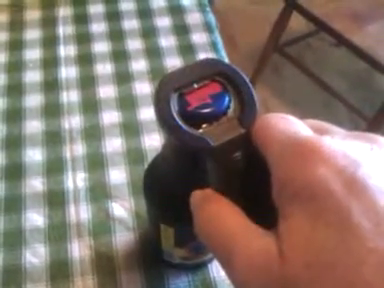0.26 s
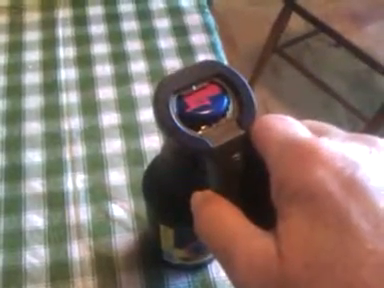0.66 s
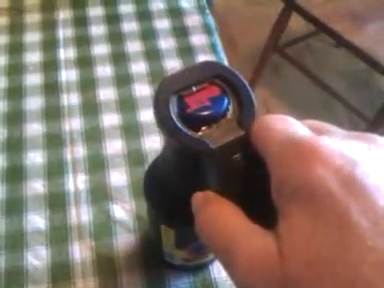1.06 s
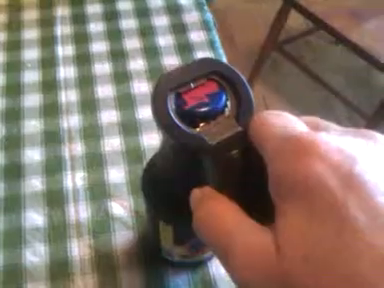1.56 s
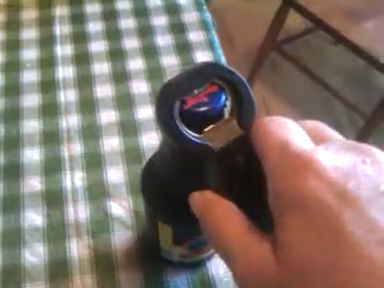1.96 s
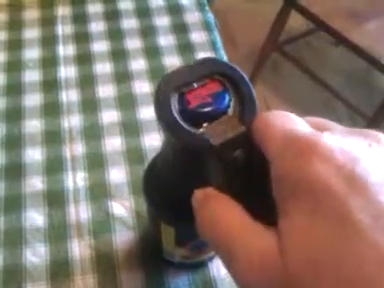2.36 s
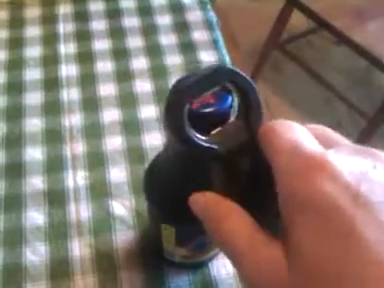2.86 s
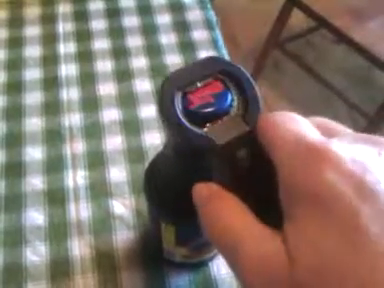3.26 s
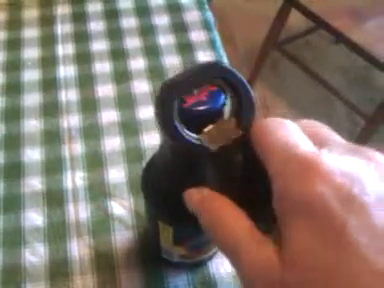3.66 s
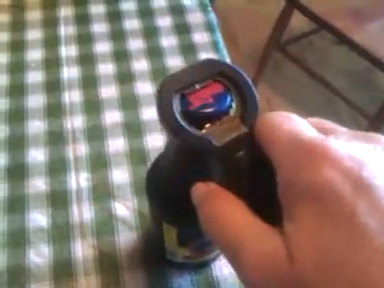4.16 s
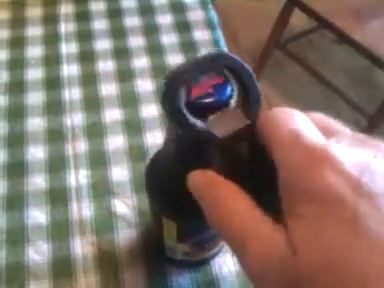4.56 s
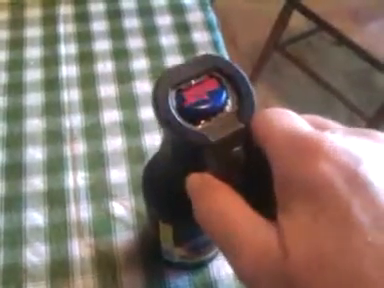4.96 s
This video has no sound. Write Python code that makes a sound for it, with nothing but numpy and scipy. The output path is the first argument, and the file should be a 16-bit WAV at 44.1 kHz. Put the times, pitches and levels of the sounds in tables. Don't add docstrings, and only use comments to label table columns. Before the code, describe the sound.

In a quiet indoor room, a small microphone with muffled treble picks up hum and soft hiss. First come four hollow, honking rubs of a hand on a plastic case. Then steel meets bottle cap: faint and firm ticks, brief gritty drags, short cap rings and low wooden knocks, the hardest clack near the end, then only room air.

```python
import sys
import numpy as np
from scipy import signal
from scipy.fft import rfft, irfft
from scipy.io import wavfile
from scipy.ndimage import uniform_filter1d, minimum_filter1d

SR = 44100
rng = np.random.default_rng(int(sys.argv[2]) if len(sys.argv) > 2 else 0)


def persist_wave(psi):
    counts = np.round(np.clip(psi, -1, 1) * 32767).astype(np.int16)
    wavfile.write(sys.argv[1], SR, np.atleast_2d(counts).T)


def convert_level_to_amplitude(level_db):
    exponent = np.asarray(level_db, float) / 20
    return 10 ** exponent


N = 230510
LEAD = 300


def evened(x):
    return x / np.sqrt(np.mean(x ** 2) + 1e-20)


def read(points, hz):
    f, value = np.transpose(points)
    return np.interp(np.log(hz + 1), np.log(f + 1), value)


def add(mix, s, sound):
    part = mix[round(s * SR):][:len(sound)]
    part += sound[:len(part)]


def smoothed(x, size_0, size_1):
    return uniform_filter1d(uniform_filter1d(x, size_0, axis=0), size_1, axis=1)


def resonate(x, hz, width):
    turn = np.exp(2j * np.pi * hz * np.arange(len(x)) / SR)
    r = np.exp(-np.pi * width / SR)
    return 2 * (turn * signal.lfilter([1 - r], [1, -r], x / turn)).real


def body(x, modes):
    total = 0
    for hz, width, db in modes:
        once = resonate(x, hz, 1.76 * width)
        total = total + convert_level_to_amplitude(db) * resonate(once, hz, 1.76 * width)
    return evened(total)


def coloured(x, points):
    gain = convert_level_to_amplitude(read(points, np.fft.rfftfreq(len(x), 1 / SR)))
    return evened(irfft(rfft(x) * gain, len(x)))


def slips(size, per_s, spread_db):
    draw = rng.random((size, 3))
    happens = draw[:, 0] < per_s / SR
    strength = convert_level_to_amplitude(-spread_db * np.log(draw[:, 2] + 0.018))
    return happens * np.sign(draw[:, 1] - .5) * strength


def dying(hz, t60):
    t = np.arange(9000) / SR
    return convert_level_to_amplitude(-60 * t / t60) * np.sin(2 * np.pi * hz * t)


def air():
    # frequency in Hz, level in dB per Hz.
    air_colour = [(15, -52.5), (25, -6.5), (90, -10.5), (144, -9), (178, -6.5), (205, -4), (315, -4),
                  (380, -2), (596, -4), (720, -6), (3200, -14.5), (4670, -20), (7150, -21), (9300, -71),
                  (15700, -120)]
    # frequency in Hz, width in Hz, level in dB.
    port = (4705, 420, -70.5)
    # frequency of a hum note in Hz, level in dB rms.
    hum_notes = [(59.3, -77.5), (84.5, -73.5), (120, -79), (180, -78), (318, -73.5), (415, -75.5)]
    frames = N // 256 + 5
    patches = evened(smoothed(rng.standard_normal((513, frames)), 12, 16))
    hiss = coloured(rng.standard_normal(frames * 256), air_colour)
    z = signal.stft(hiss, nperseg=1024, noverlap=768)[2][:, :frames] * convert_level_to_amplitude(0.95 * patches)
    wash = convert_level_to_amplitude(-61.5) * evened(signal.istft(z, nperseg=1024, noverlap=768)[1][:N])
    wash = wash + convert_level_to_amplitude(port[2]) * body(rng.standard_normal(N), [port])
    t = np.arange(N) / SR
    for hz, db in hum_notes:
        waver = evened(resonate(rng.standard_normal(N), hz, 5))
        tone = np.sin(2 * np.pi * (hz * t + rng.random()))
        wash = wash + convert_level_to_amplitude(db) * evened(tone + 0.18 * waver)
    return wash


def room(x):
    # frequency in Hz, time to fade by 60 dB in seconds.
    fade_times = [(300, 0.11), (1500, 0.46), (7000, 0.15)]
    taps = np.zeros(SR // 2)
    at = np.arange(200, SR // 2 - 20, 20)
    taps[at + rng.integers(0, 20, len(at))] = rng.choice([-1., 1.], len(at))
    hz, t, z = signal.stft(taps, SR, nperseg=256)
    fading = convert_level_to_amplitude(-60 * t / read(fade_times, hz)[:, None])
    tail = signal.istft(z * fading, SR, nperseg=256)[1]
    return signal.fftconvolve(x, tail / np.linalg.norm(tail))[:N]


def thump(db, hz):
    rise = 1 - np.exp(-np.arange(9000) / SR / 0.0078)
    notes = dying(hz, 0.11) + 0.54 * dying(0.54 * hz, 0.081) + 0.29 * dying(1.2 * hz, 0.23)
    return convert_level_to_amplitude(db + 2.5) * rise * notes


def scrape(length, edge_db, table_db, rim_db):
    # frequency in Hz, width in Hz, level in dB.
    crimp = [(1300, 500, -0.5), (1630, 21, 7.5), (1900, 500, -17)]
    u = np.linspace(0, 1, round(length * SR))
    drive = slips(len(u), per_s=3300, spread_db=3.0)
    edge = convert_level_to_amplitude(edge_db) * body(drive, crimp)
    rumble = convert_level_to_amplitude(table_db) * body(drive, [(310, 130, -1.5), (546, 88, -0.5)])
    rim = convert_level_to_amplitude(rim_db) * body(drive, [(3380, 66, -2.0), (3080, 530, -7.0)])
    bite = np.minimum(u / 0.27, 1)
    ease = convert_level_to_amplitude(-4.5 * u ** 2)
    return (edge + rumble + rim) * bite * ease * signal.windows.tukey(len(u), .15)


def tick(blow_db, hz, knock_db, snap_db, edge_db, chatter):
    # frequency in Hz, level in dB, 60 dB fade in seconds.
    lasting = [(1174, -14.5, 0.037), (1407, -23.5, .08), (1630, -10, 0.53), (2630, -42, 0.17),
               (3420, -25, 0.07)]
    t = np.arange(len(chatter)) / SR
    colour = [(200, -25), (640, knock_db + 1), (hz, 0), (2300, -5), (3300, snap_db + 0.5),
              (5100, snap_db - 9.5), (7000, edge_db + 4.5), (9000, edge_db - 20)]
    grit = coloured(chatter, colour)
    steel = dying(hz, 0.021) + 0.56 * dying(0.836 * hz, 0.01)
    glass = convert_level_to_amplitude(knock_db + 1.0) * dying(637, 0.018)
    cap = convert_level_to_amplitude(snap_db + 2.5) * (dying(3265, 0.0073) + 0.77 * dying(3520, 0.0039))
    edge = convert_level_to_amplitude(edge_db + 6.0) * dying(6660, 0.0036)
    rattle = convert_level_to_amplitude(-60 * t / 0.0096) + convert_level_to_amplitude(-18.5 - 60 * t / 0.11)
    crack = convert_level_to_amplitude(-4) * grit * rattle + convert_level_to_amplitude(-3.5) * (steel + glass + cap + edge)
    crack = crack * (1 - np.exp(-t / 0.00081))
    rings = sum(convert_level_to_amplitude(db) * resonate(crack, f, 2.2 / t60) for f, db, t60 in lasting)
    lead_in = convert_level_to_amplitude(-27.5) * grit[-LEAD:] * np.linspace(.3, 1, LEAD)
    return convert_level_to_amplitude(blow_db) * np.concatenate([lead_in, crack + convert_level_to_amplitude(18) * rings])


def opener_ticks():
    # start in seconds, blow in dB, contact note in Hz,
    # glass knock and cap snap in dB relative to the blow.
    sharp = [
        (2.256, -41.5, 1640, 7, 8),
        (2.832, -51.5, 964, -20, -15),
        (3.152, -35, 1600, -3.5, 3.5),
        (4.566, -51, 1640, -13, -8),
        (4.779, -27, 1313, -10, -9),
        (4.784, -40, 1170, -20, -12),
    ]
    blunt = [(1.862, -52, 1160, 4, -19), (2.737, -44.5, 1540, 1.5, -25), (2.997, -50, 1290, -25, -19),
             (3.275, -28.5, 1277, -26, -9.5), (3.282, -39.5, 1200, -12, -5), (3.779, -37.5, 1590, -6, -8),
             (3.959, -52, 1580, 0, -12), (4.039, -29, 1545, -3.5, -7), (4.042, -41.5, 1670, 1.5, -30),
             (4.049, -37.5, 1900, -20, -23), (4.453, -41, 1470, 4.5, -7.5), (4.792, -34.5, 1300, -1, 1.5),
             (4.797, -37, 1410, -6, -20)]
    # start in seconds, level in dB, note in Hz.
    knocks = [
        (2.257, -50, 309),
        (3.153, -46, 282),
        (3.272, -46.5, 281.5),
        (4.039, -48, 298),
        (4.454, -50, 268),
        (4.778, -46, 281.4),
        (4.792, -46.5, 235),
    ]
    mix = np.zeros(N)
    for table, edge_db in ((sharp, 0.5), (blunt, -21)):
        for (s, *row), chatter in zip(table, rng.standard_normal((len(table), 9000))):
            add(mix, s - LEAD / SR, tick(*row, edge_db, chatter))
    for s, db, hz in knocks:
        add(mix, s, thump(db, hz))
    return mix


def opener_scrapes():
    # start in seconds, length in seconds, scrape in dB, table rumble in dB, rim in dB.
    drags = [(2.191, 0.057, -57.5, -60.5, -66), (2.26, 0.11, -65, -68, -70.5),
             (2.731, 0.12, -61.5, -62, -69), (3.782, .045, -65, -66, -63), (3.944, .07, -65.5, -61.5, -78),
             (4.457, 0.046, -70, -55.5, -76), (4.505, 0.091, -59.5, -56, -68),
             (3.285, 0.053, -63, -60, -77), (4.733, .045, -60, -64, -75), (4.06, 0.055, -62, -62.5, -72),
             (4.803, 0.056, -66, -66, -73)]
    mix = np.zeros(N)
    for s, *row in drags:
        add(mix, s, scrape(*row))
    return mix


def pressure_db(t):
    # touch in seconds, lift in seconds, pressure in dB, sag in dB, rise in seconds.
    strokes = [
        (-.05, 0.325, -39, -1.5, .03),
        (0.349, 0.417, -51.5, -3, 0.018),
        (0.467, 0.494, -48.5, 0.5, 0.011),
        (0.478, 0.659, -38.5, -1.5, 0.036),
        (0.661, 0.739, -46, -1.5, 0.012),
        (0.777, 0.96, -41.5, 0.5, 0.028),
        (0.981, 1.015, -56, -5, 0.011),
        (1.027, 1.256, -41, 0, 0.027),
        (1.262, 1.329, -51.5, -2, .01),
    ]
    touch, lift, db, sag_db, rise = np.transpose(strokes)[:, :, None]
    landing = -16 * np.clip(1 - (t - touch) / rise, 0, 9)
    sagging = sag_db * np.clip((t - touch) / (lift - touch), 0, 1) ** 1.8
    lifting = -549 * np.maximum(t - lift, 0)
    return 20 * np.log10(convert_level_to_amplitude(db + landing + sagging + lifting).sum(0))


def singing(drive, note, catches):
    t = np.arange(len(drive)) / SR
    ring = body(drive, [(*note, 0)])
    power = uniform_filter1d(uniform_filter1d(ring ** 2, size=500), size=500)
    swell = np.sqrt(abs(power) + 1e-3)
    ring = evened(ring / swell ** .8)
    swells = sum(convert_level_to_amplitude(db - 7.9 * (2 * (t - s) / length) ** 2) for s, length, db in catches)
    return ring, ring * swells


def rub():
    # frequency in Hz, width in Hz.
    hollow_note = (748, 39)
    wall_note = (872, 36)
    # middle in seconds, length in seconds, ring in dB.
    hollow_catches = [(0.104, 0.041, -30), (0.202, 0.048, -38.5), (0.296, 0.016, -45), (0.404, 0.025, -45),
                      (0.538, 0.078, -43), (0.632, 0.056, -31.5), (0.834, 0.05, -36.5), (.912, 0.043, -37),
                      (1.074, 0.056, -35.5), (1.185, 0.044, -33), (1.238, 0.046, -37)]
    wall_catches = [
        (0.054, 0.054, -41.5),
        (0.598, .04, -40.5),
        (0.698, 0.056, -40),
        (0.932, 0.046, -45.5),
        (1.11, 0.056, -49),
    ]
    # frequency in Hz, width in Hz, level in dB.
    wall_modes = [(867.6, 24, -0.5), (695, 72, -6), (805.5, 49, -1.5), (965, 16, -14), (857, 330, -15)]
    shell_modes = [(2800, 182, 3), (2958, 67, -2.5), (2640, 48, -6), (2418, 297, -5), (3096, 52, -6),
                   (1877, 167, -9), (2153, 74, -12.5), (1479, 50, -12.5), (4016, 26, -13.5)]
    # frequency in Hz, level in dB per Hz.
    fizz_colour = [(150, -60.5), (300, -15), (400, -8), (550, -8), (1000, 0.5), (1300, -2), (2000, -2.5),
                   (3300, -1.5), (3700, -6.5), (4800, -12), (5300, -41), (7500, -54)]
    t = np.arange(0, 1.6, 1 / SR)
    press_db = pressure_db(t)
    rasp_db = pressure_db(t - 0.0048)
    drive = slips(len(t), per_s=7000, spread_db=1.63)
    hollow, hollow_song = singing(drive, hollow_note, hollow_catches)
    wall_song = singing(drive, wall_note, wall_catches)[1]
    case = convert_level_to_amplitude(-7.5) * hollow + convert_level_to_amplitude(-3) * body(drive, wall_modes)
    fizz_db = -1.5 + 0.27 * (rasp_db + 39.5)
    fizz = convert_level_to_amplitude(fizz_db) * coloured(drive, fizz_colour)
    shell = convert_level_to_amplitude(rasp_db) * (convert_level_to_amplitude(-2.44) * body(drive, shell_modes) + fizz)
    return convert_level_to_amplitude(press_db) * case + shell + hollow_song + wall_song


def scene():
    hand = np.zeros(N)
    add(hand, 0, rub())
    ticks = opener_ticks()
    drags = opener_scrapes()
    echoes = room(convert_level_to_amplitude(-14.5) * hand + convert_level_to_amplitude(-13.5) * (ticks))
    return mixed(hand, ticks + drags)


def mixed(hand, opener):
    echoes = room(convert_level_to_amplitude(-14.5) * hand + convert_level_to_amplitude(-13.5) * opener)
    return (hand + opener + echoes + air())[None]


def thinned(x):
    # frequency in Hz, level under the loudness in dB.
    mask = [(1500, -60), (3000, -48), (4800, -48), (5400, -44), (7300, -47)]
    hz, _, z = signal.stft(x, SR, nperseg=512, noverlap=384)
    power = abs(z) ** 2
    loud_db = 10 * np.log10(power[3:].sum(0) + 1e-12)
    jump_db = -minimum_filter1d(-loud_db, size=13, origin=-6) - loud_db
    ragged = evened(smoothed(rng.standard_normal(z.shape), 6, 6))
    steady_db = np.minimum(uniform_filter1d(loud_db, size=30), -42)
    early_db = (.68 + .2 * ragged) * jump_db * (steady_db < -48)
    limit_db = steady_db + early_db + read(mask, hz)[:, None]
    patch_db = 10 * np.log10(abs(smoothed(power, 2, 4)) + 1e-20)
    kept = np.clip((patch_db - limit_db) / 2, 0, 1)
    return signal.istft(z * kept, SR, nperseg=512, noverlap=384)[1][:N]


def roll_off(x):
    return signal.sosfilt(signal.butter(12, 8700, fs=SR, output="sos"), x)


def record(dry):
    band = signal.firwin(801, 7284, window=("kaiser", 9), fs=SR)
    narrow = signal.oaconvolve(dry[0], band, "same")
    return roll_off(thinned(narrow)[None] + 0.001)


dry = scene()
out = record(dry)
persist_wave(out)
```